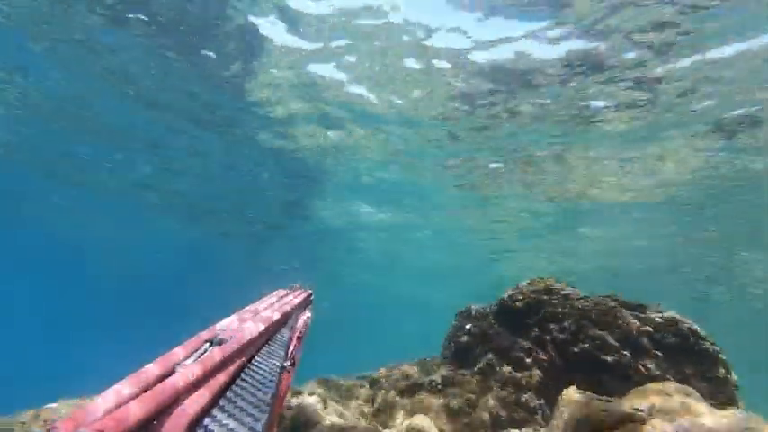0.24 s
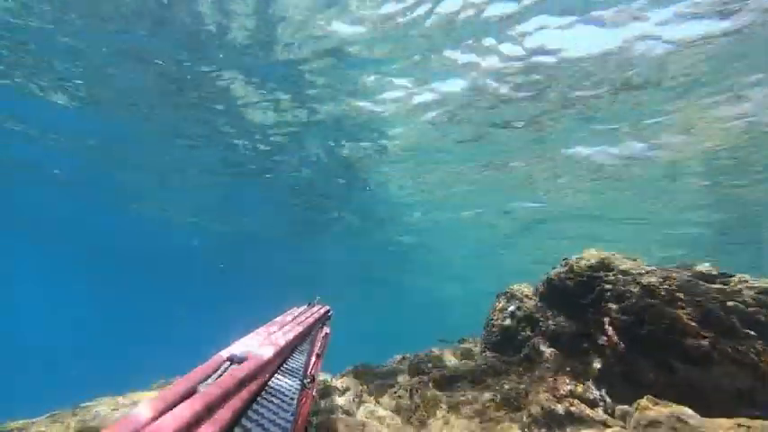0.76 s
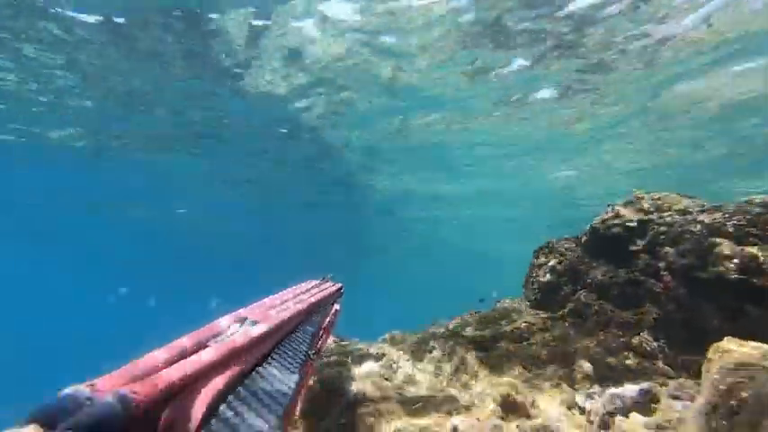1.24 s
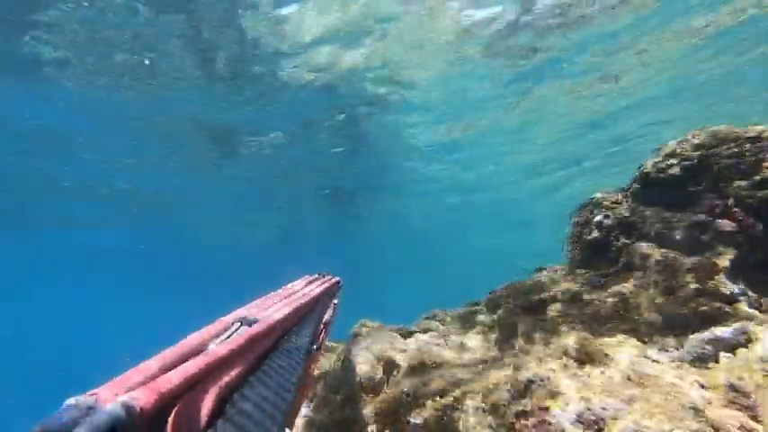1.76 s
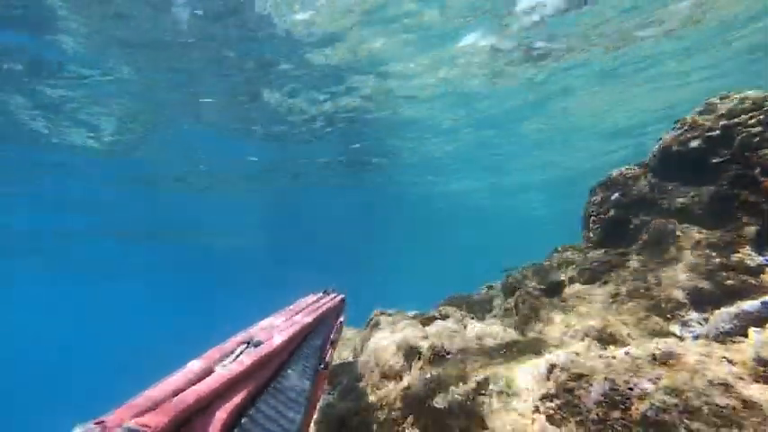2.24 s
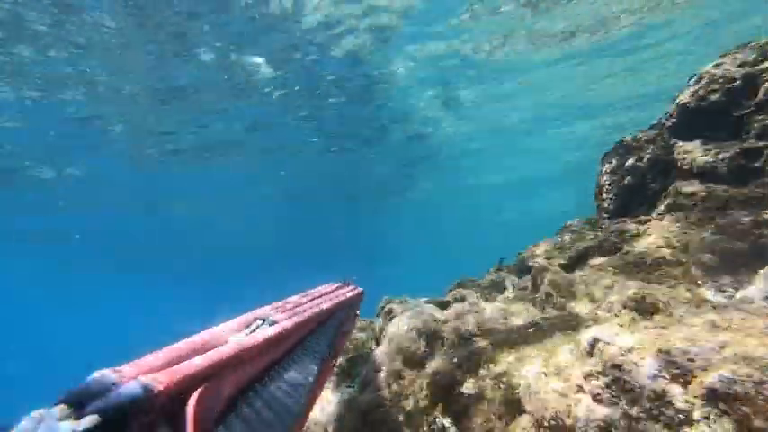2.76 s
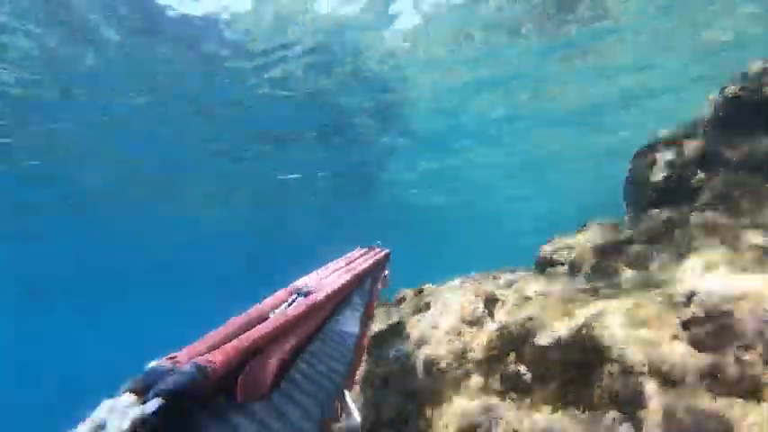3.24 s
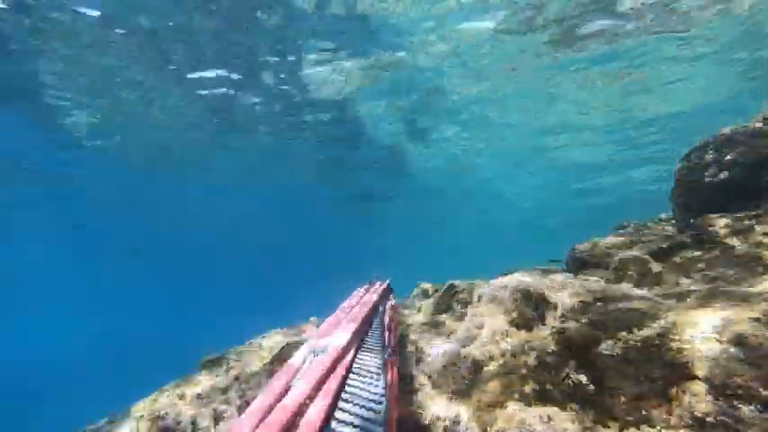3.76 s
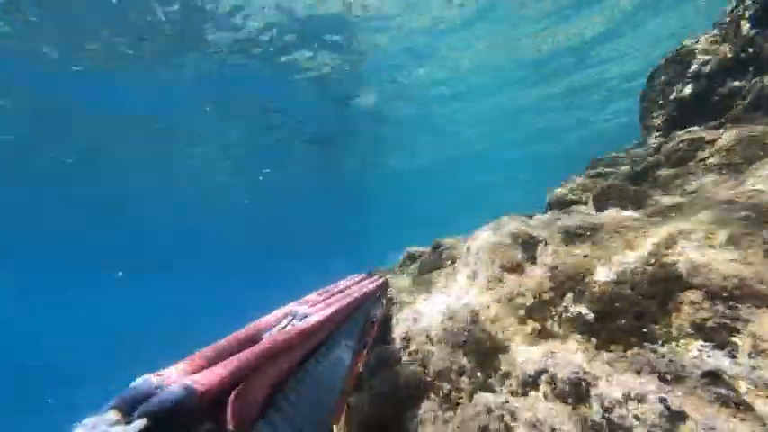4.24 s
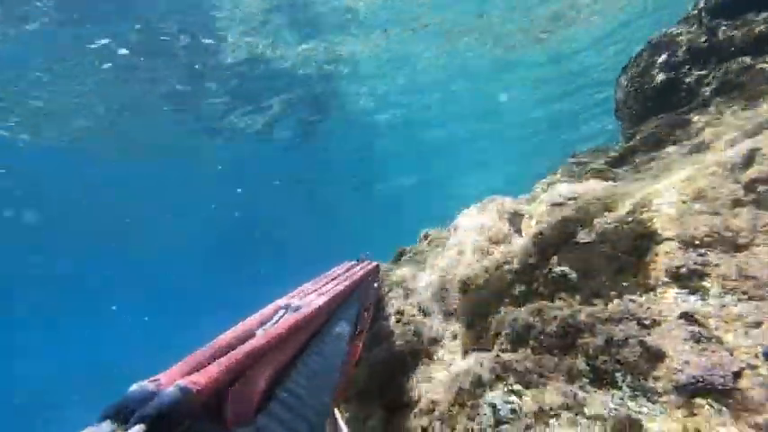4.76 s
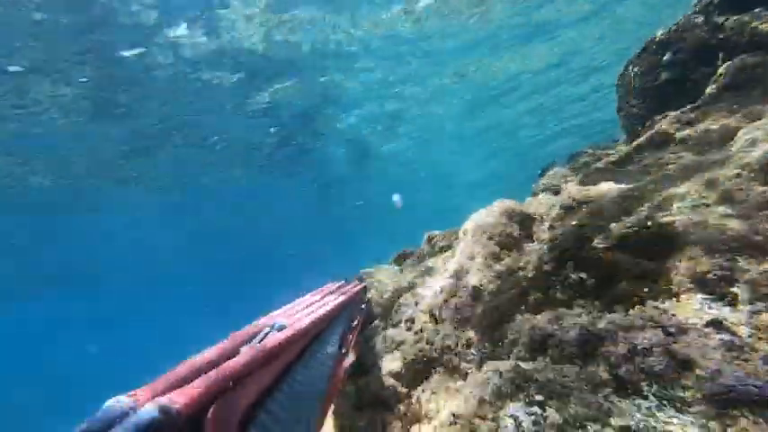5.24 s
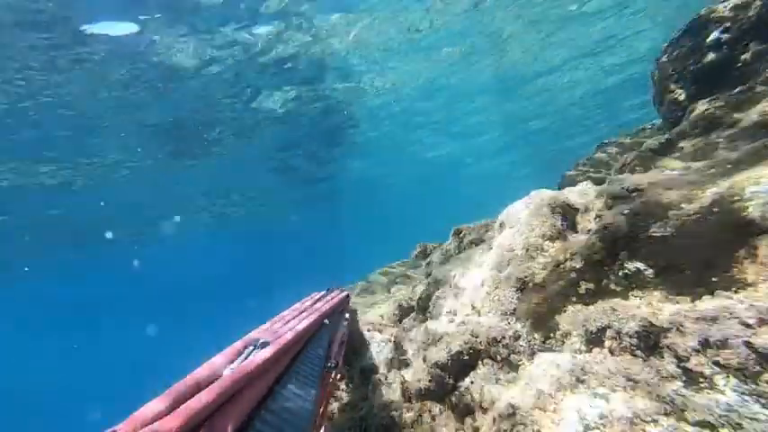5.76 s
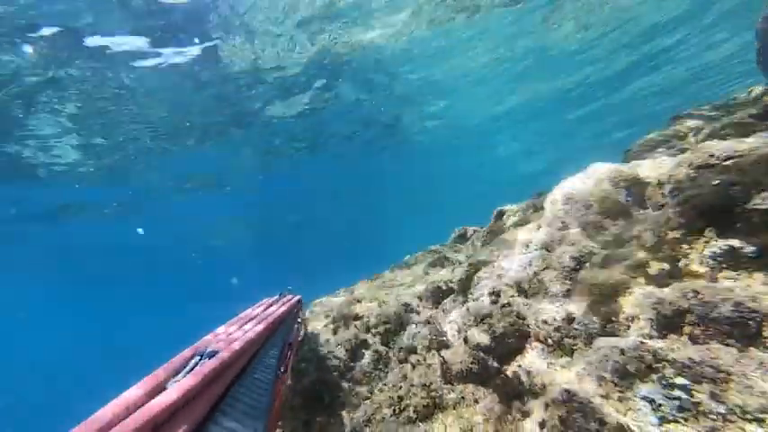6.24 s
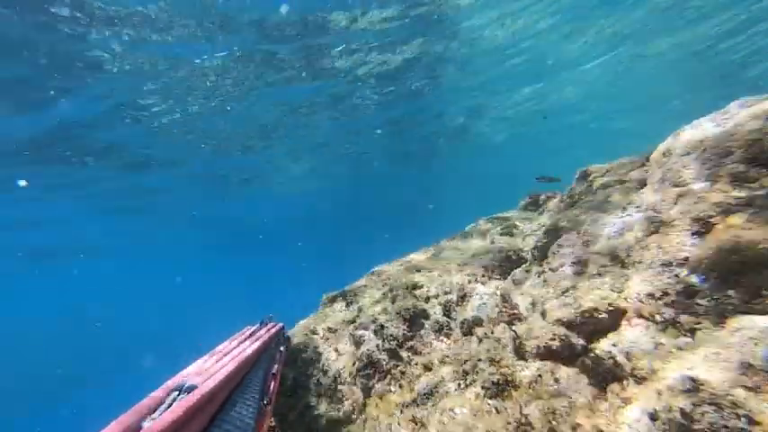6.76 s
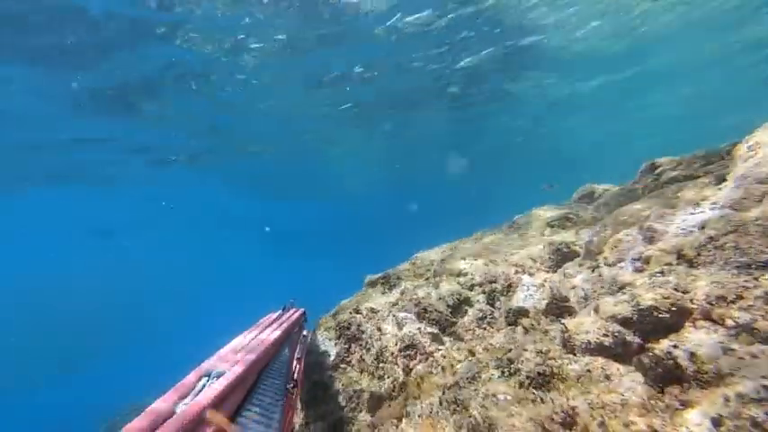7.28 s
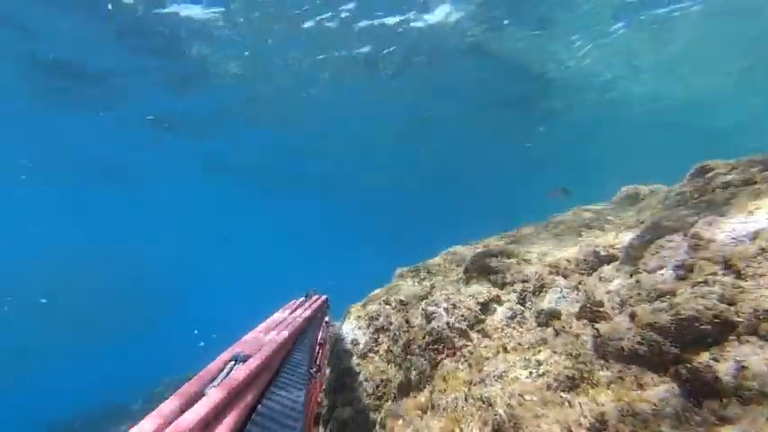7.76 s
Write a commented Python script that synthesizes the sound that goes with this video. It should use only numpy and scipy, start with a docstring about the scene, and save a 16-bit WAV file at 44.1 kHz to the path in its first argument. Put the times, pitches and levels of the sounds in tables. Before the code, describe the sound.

Underwater beside a shallow rocky reef, everything is heard very close through a camera's hard housing, in stereo with a boxy, muffled tone. From 0 to 3.2 seconds, gear rattles irregularly in dull, hard knocks, with chattering scrapes that turn brighter after 1.3 seconds and brief hollow ringing blips. Low pressure rumble drifts underneath. At 3.25 seconds a loud surge hits: rapid hollow knocks and clacks, a deep plop, gurgling and fizz. More bursts follow near 3.7, 4.4, 5.0 and 5.4 seconds, each quickly dying, with smaller knocks between. From about 5.9 to 6.8 seconds it is calmer, with faint swishing and a sharp snap at 6.5. Deeper churning and low plops return at 6.8 to 7.5 seconds, then fade towards 8 seconds. Distant snapping shrimp form a faint crackling wash throughout, with occasional single sharp snaps.

```python
"""A shallow rocky reef under water, heard through the housing of a diver's camera with two microphone ports.
First the gear rattles and scrapes: short noise hits and small slips ring the housing, with brief notes.
Then surges of water knock, plop, gurgle and fizz: swelling tones, rising bubble tones and coloured noise.
Snapping shrimp crackle throughout: a steady wash of far ones under single sharp snaps, a few of which,
around 6.95 s, are probably fizzing bubbles."""
import sys
import numpy as np
from scipy import signal
from scipy.fft import rfft, irfft, next_fast_len
from scipy.io import wavfile
from scipy.ndimage import uniform_filter1d

SR = 44100
rng = np.random.default_rng(int(sys.argv[2]) if len(sys.argv) > 2 else 0)


def dump_mix(stems):
    """Bounce the given channels to the path in sys.argv[1] as a 16-bit WAV at rate SR."""
    frames = np.atleast_2d(stems).T  # one column per channel
    limited = np.clip(frames, -1, 1)  # hard clip at full scale
    pcm = np.round(limited * 32767).astype(np.int16)
    wavfile.write(sys.argv[1], SR, pcm)


N = 353241  # length in samples, about 8 s

# All levels in the tables are relative: the functions raise or lower whole layers afterwards.

# Gear knocks. Each row: start in seconds, peak level in dB, treble against the body in dB.
RATTLES = [(0.052, -17.5, -34.5), (0.097, -19, -25.5), (0.125, -14, -23), (0.37, -14, -31),
           (0.482, -18.5, -49), (0.65, -21.5, -23), (0.745, -24, -39), (0.833, -15, -29.5),
           (0.907, -18, -52), (0.979, -20, -20), (1.275, -16, -21.5), (1.328, -22, -24.5),
           (1.349, -13, -27.5), (1.375, -23.5, -22), (1.417, -18, -35.5), (1.486, -22.5, -39),
           (1.547, -23.5, -34), (1.585, -12, -20), (1.738, -27, -26), (1.9751, -14.5, -32.5),
           (2.03, -28, -30.5), (2.399, -16.5, -25.5), (2.482, -18, -22), (2.603, -17.5, -24.5),
           (2.634, -20, -39.5), (2.713, -17.5, -27.5), (2.774, -19.5, -49.5), (2.923, -19.5, -29.5),
           (3.003, -22.5, -39.5), (3.066, -15, -29)]
# Sound colour of a knock, also of bright scraping. Each row: frequency in Hz, gain in dB.
RATTLE_COLOUR = [(120, -16), (310, -4), (400, -32.5), (510, -10.5), (650, 4), (900, 6), (1150, 1.5),
                 (1850, 0), (2300, -27.5), (2900, -15.5), (4000, -38.5), (4900, -42), (6000, -39.5),
                 (13000, -87)]


def rattles(level_db=5.5, mode_db=-6, usual_treble_db=-33, brightening=1.77, cloud_s=0.11, halving_db=8):
    """Hard knocks of the gear ring the housing; the brighter the knock, the shorter its reflections."""
    out = np.zeros((2, N))
    ring = housing_ring()
    for s, db, treble_db in RATTLES:
        extra_treble_db = treble_db - usual_treble_db
        # the reflections last half as long for every halving_db of extra treble, within limits
        t60 = cloud_s * 2 ** np.clip(-extra_treble_db / halving_db, -2, 1)
        blow = strike(t60, scatter=1.21, contact_s=0.0032)
        body = colour(blow, RATTLE_COLOUR, brightening * extra_treble_db)
        tone = signal.fftconvolve(blow, ring[None], axes=1)[:, :blow.shape[1]]
        knock = unit(body) + amp(mode_db) * unit(tone)
        add(out, s, peaked(knock, db + level_db))
    return out


# Notes of the housing when struck. Each row: pitch in Hz, level in dB, time to fall by 60 dB in seconds.
HOUSING_MODES = [(607, -2, .07), (885, 0, .055), (1455, -7, .04), (1790, -4, .035)]


def housing_ring():
    """The stiff housing answers a blow with several dying notes at once."""
    t = np.arange(SR // 8) / SR
    return sum(amp(db - 60 * t / t60) * np.sin(2 * np.pi * hz * t) for hz, db, t60 in HOUSING_MODES)


# Chattering rubs of the gear, which also stir the gurgle. Each row: start and end in seconds, level in dB.
RUBS = [(0.082, 0.138, -24.5), (0.195, 0.24, -35.5), (0.468, 0.535, -27.5), (0.565, 0.615, -26.5),
        (0.65, 0.7, -32), (0.71, 0.77, -32), (0.835, 0.872, -27.5), (0.896, 0.96, -30.5),
        (0.975, 1.055, -26.5), (1.11, 1.16, -43), (1.185, 1.2, -40), (1.225, 1.26, -35), (1.335, 1.4, -32),
        (1.417, 1.445, -27), (1.458, 1.52, -32.5), (1.6, 1.622, -30), (1.74, 1.763, -36), (1.96, 2.0, -38),
        (2.035, 2.065, -40.5), (2.125, 2.2, -39), (2.316, 2.38, -40.5), (2.38, 2.422, -31),
        (2.45, 2.48, -29), (2.48, 2.563, -21), (2.712, 2.745, -24.5), (2.755, 2.797, -35),
        (2.98, 3.035, -27.5), (3.065, 3.09, -34.5), (3.09, 3.23, -38)]
# The scraping grows brighter as the grip shifts. Each row: time in seconds, bright share from 0 to 1.
GRIP = [(0, 0.03), (.5, 0.02), (1.2, 0.02), (1.35, 0.73), (3.2, 0.93)]
# Sound colour of the dull scraping. Each row: frequency in Hz, gain in dB.
SCRAPE_COLOUR = [(200, -44), (310, 8), (390, -21.5), (600, 11.5), (770, -6.5), (900, 19.5), (1150, -39),
                 (1460, -22), (1900, -68), (2300, -20), (2900, -9), (4000, -53), (5000, -21), (13000, -123)]


def scrape(touch_db=-50, rub_db=1.0, ring_db=-1):
    """Quick small slips of the gear ring the housing: faint while it is held, loud in each rub."""
    slips = clicks(per_s=380, spread_db=2.0) + 0.09 * rng.standard_normal((2, N))
    # swapping the two channels makes the ring differ from the body of the sound
    ringing = signal.oaconvolve(slips[::-1], housing_ring()[None], axes=1)[:, :N]
    dull = unit(unit(colour(slips, SCRAPE_COLOUR)) + amp(ring_db) * unit(ringing))
    # the same slips, shifted by one second so that they do not coincide with the dull ones
    shifted = np.roll(slips, SR, axis=1)
    bright = unit(colour(shifted, RATTLE_COLOUR, treble_db=6.5, corner_hz=1100))
    share = np.clip(curve(GRIP), 0, 1)
    rubbing = steadied(np.sqrt(1 - share) * dull + np.sqrt(share) * bright, span_s=0.039)
    held = amp(touch_db) * during(GRIP)
    return rubbing * (held + amp(rub_db) * strokes(RUBS, attack_s=0.0028, release_s=0.001))


# Short ringing notes of the rubbing gear. Each row: start in seconds, pitch in Hz, peak level in dB.
BLIPS = [(0.093, 903, -17.5), (0.123, 880, -18), (0.585, 670, -22), (0.654, 615, -23.5),
         (0.679, 670, -28.5), (0.905, 931, -20), (0.98, 960, -18), (1.011, 690, -23), (1.336, 753, -29),
         (1.606, 1790, -23.5), (2.533, 887, -17), (2.631, 876, -16), (2.999, 766, -18.5)]


def blips(level_db=0, cycles=7.0):
    """Brief notes while the gear sticks and rubs: several near 890 Hz, a housing note, others elsewhere."""
    out = np.zeros((2, N))
    for s, hz, db in BLIPS:
        add(out, s, amp(db + level_db) * ping(hz, cycles, rise=0.0017))
    return out


# Knocks of water on the housing. Each row: start in seconds, then the levels in dB of the hollow note,
# the hard clack and the tick.
KNOCKS = [(3.2516, -6.5, -4.5, -17.5), (3.2605, -8.5, -8, -17.5), (3.2686, -4.5, -11.5, -20.5),
          (3.2788, -4, -24.5, -21.5), (3.3346, -7, -25, -24.5), (3.349, -13.5, -23, -34),
          (3.3579, -15.5, -22, -35), (3.643, -11.5, -9.5, -23.5), (3.6723, -7, -25, -26.5),
          (3.7275, -15, -18.5, -21), (3.734, -11, -18, -24.5), (3.7613, -8.5, -27.5, -25),
          (3.9061, -13.5, -15, -22), (4.0119, -22.5, -24, -31), (4.409, -10.5, -12.5, -17),
          (4.4182, -4, -14.5, -20.5), (4.4335, -8.5, -30, -23), (4.4533, -19, -17, -25),
          (4.4879, -7, -28, -28), (4.5423, -8, -28.5, -30), (4.705, -26, -27, -36),
          (4.7364, -21, -27, -29.5), (4.7683, -16.5, -34.5, -30.5), (4.7934, -11.5, -30, -28),
          (4.8831, -20, -20, -25.5), (5.0201, -6, -19, -21.5), (5.0845, -9.5, -25.5, -29.5),
          (5.1418, -14, -30.5, -33), (5.1655, -15.5, -28.5, -33), (5.2051, -10, -32.5, -35.5),
          (5.231, -15, -29.5, -36.5), (5.2764, -21.5, -40, -59), (5.4108, -22, -13.5, -24),
          (5.4312, -9.5, -26, -26.5), (5.4543, -9, -20.5, -23), (5.533, -7.5, -27.5, -28),
          (5.5531, -8.5, -21.5, -26.5), (5.5932, -11, -32, -32), (5.626, -15, -28, -39),
          (5.8089, -9.5, -32, -33), (6.0641, -19.5, -28.5, -37), (6.8367, -13, -32, -41),
          (6.8546, -8.5, -36.5, -39), (6.8643, -9, -21.5, -30.5), (6.9207, -17.5, -21.5, -27),
          (6.948, -12.5, -21.5, -29), (7.0647, -13, -18, -30), (7.38, -16, -18, -32.5),
          (7.5196, -19.5, -22, -30), (7.5643, -30, -22, -30.5), (7.6387, -24.5, -24, -29)]
# Sound colour of the tick. Each row: frequency in Hz, gain in dB.
TICK_COLOUR = [(500, -27), (2000, -16.5), (2400, -1), (2900, 1.5), (4600, -11.5), (7000, -23), (9500, -36),
               (13000, -54.5)]


def knocks(hollow_db=-1, clack_db=0, tick_db=0, clack_hz=1750, note_hz=870, octave_db=70, tail_db=-15):
    """Water slaps the housing: a hollow note with a sinking tail, a clack of the wall, and a tick."""
    out = np.zeros((2, N))
    for s, hollow, clack, tick in KNOCKS:
        knock = np.zeros((2, SR // 20))
        # soft slaps sound lower: one octave for every octave_db that the clack lies below the hollow note
        hz = note_hz * 2 ** (min(clack - hollow, 0) / octave_db)
        add(knock, 0, amp(hollow + hollow_db) * ping(hz, cycles=0.95))
        add(knock, 0, amp(hollow + tail_db) * ping(0.915 * hz, cycles=2.9, rise=-0.025))
        wall_hz = clack_hz * (1 + 0.095 * (rng.random() - .5))
        add(knock, 0.0003, amp(clack + clack_db) * ping(wall_hz, cycles=2.35))
        contact = strike(t60=0.026, scatter=0.18, contact_s=0.0021, onset_s=0.0018)
        add(knock, 0, peaked(colour(contact, TICK_COLOUR), tick + tick_db))
        add(out, s, scattered(knock, db=-10, t60=0.048))
    return out


# Plops of large air pockets. Each row: start in seconds, starting pitch in Hz, peak level in dB.
GLUGS = [(3.263, 240, -5), (3.734, 232, -11.5), (4.419, 207, -5), (5.023, 330, -8.5), (5.087, 288, -12.5),
         (5.477, 284, -11.5), (6.918, 207, -13), (7.107, 214, -16), (7.132, 186, -12), (7.403, 186, -16),
         (7.448, 171, -13.5)]


def glugs(level_db=-1):
    """Large air pockets are squeezed against the housing: each gives one short, low plop."""
    out = np.zeros((2, N))
    for s, hz, db in GLUGS:
        add(out, s, amp(db + level_db) * ping(hz, cycles=0.9, rise=0.0057))
    return out


# Surges of water against the housing. Each row: arrival, rise time and hold time in seconds,
# then the levels in dB of the deep push, the burbling air and the fizz.
SURGES = [(3.254, 0.013, 0.035, -8, -21, -24), (3.656, 0.019, 0.021, -7, -27, -28.5),
          (3.719, 0.0065, 0.012, -9, -29.5, -21), (4.42, 0.03, 0.018, -8, -19, -20),
          (4.754, 0.013, 0.022, -20.5, -32, -24), (5.013, 0.011, 0.056, -10, -27, -23),
          (5.176, 0.05, 0.26, -23, -35, -78), (5.413, 0.0093, 0.02, -7, -25, -17.5),
          (5.536, 0.015, 0.065, -27, -27, -30), (5.756, 0.016, 0.012, -12.5, -24, -33.5),
          (5.985, 0.21, 0.17, -44, -41, -39.5), (6.228, 0.03, 0.21, -64, -40, -39.5),
          (6.829, 0.0071, 0.012, -14.5, -27, -74), (6.905, 0.014, 0.044, -9, -30.5, -53),
          (7.097, 0.015, 0.07, -9.5, -30.5, -38), (7.327, 0.22, 0.13, -11.5, -24.5, -66),
          (7.842, 0.011, 0.045, -24, -34, -44)]
# how fast each part of a surge dies after its hold, in dB per second
PUSH_FALL, BURBLE_FALL, FIZZ_FALL = 68.7, 112, 94


def surging(part, fall_db_per_s):
    """Gain of one part of the surges (0 push, 1 burble, 2 fizz): each rises, holds and dies steadily."""
    t, power = np.arange(N) / SR, np.zeros(N)
    for s, rise_s, hold_s, *levels_db in SURGES:
        rise = np.clip((t - s) / rise_s + .5, 0, 1)
        fall_db = fall_db_per_s * np.maximum(t - s - hold_s, 0)
        power += (rise * amp(levels_db[part] - fall_db)) ** 2
    return np.sqrt(power)


# Sound colour of the first eddies. Each row: frequency in Hz, gain in dB.
GURGLE_COLOUR = [(40, -18), (65, 6), (100, 0.5), (143, 8.5), (178, -8), (210, -2), (250, -1.5), (290, 2),
                 (350, -11), (450, -11.5), (1000, -39), (3000, -77)]
# Sound colour of the later, deeper churn. Each row: frequency in Hz, gain in dB.
CHURN_COLOUR = [(40, -13.5), (65, -9), (100, -1.5), (140, 5.5), (200, -3), (250, -5.5), (300, -3),
                (360, -28), (450, -14), (1000, -30), (3000, -78)]
# The burbling sinks to the deeper churn. Each row: time in seconds, deep share from 0 to 1.
DEEPENING = [(6.2, 0.02), (6.8, 0.95)]


def gurgle(level_db=1.5, bubble_db=-1, held_db=-48, rub_db=-18, calm_db=-61):
    """Eddies, large air pockets and smaller ones burble, stirred by surges and by the moving gear."""
    flow = rng.standard_normal((2, N))
    deep = np.clip(curve(DEEPENING), 0, 1)
    first_eddies = unit(colour(flow, GURGLE_COLOUR))
    churn = unit(colour(flow[::-1], CHURN_COLOUR))  # the same flow with its channels swapped
    eddies = np.sqrt(1 - deep) * first_eddies + np.sqrt(deep) * churn
    large = bubbles(low_hz=109.8, high_hz=159.2, per_s=20, cycles=9.4, rise=0.0066, spread_db=1.5)
    small = bubbles(low_hz=192.0, high_hz=299.3, per_s=37, cycles=6.8, rise=0.0065, spread_db=9.0)
    burble = eddies + amp(bubble_db) * unit(large + 0.1 * (1 - 1.41 * deep) * small)
    rubbing = amp(rub_db) * strokes(RUBS, attack_s=.01, release_s=0.0067)
    stirring = amp(level_db) * surging(1, BURBLE_FALL) + amp(held_db) * during(GRIP) + rubbing
    return steadied(burble, span_s=0.086) * (stirring + amp(calm_db))


# Sheets of water along the housing. Each row: start and end in seconds, level in dB.
SWISHES = [(3.225, 3.28, -22.5), (3.43, 3.6, -34), (3.612, 3.66, -27), (3.888, 3.93, -27.5),
           (4.035, 4.09, -34.0), (4.355, 4.405, -33), (4.408, 4.46, -21.5), (4.74, 4.815, -29.5),
           (5.305, 5.38, -36), (5.38, 5.418, -20), (5.53, 5.57, -26.5), (5.68, 5.76, -29),
           (6.32, 6.435, -31.5), (6.925, 6.965, -25.5), (6.97, 7.04, -32.5), (7.048, 7.07, -32.5),
           (7.09, 7.15, -27.5), (7.305, 7.37, -31), (7.37, 7.49, -31), (7.52, 7.565, -31.5),
           (7.612, 7.63, -32.5), (7.66, 7.7, -43), (7.85, 7.91, -41.5)]
# Sound colour of fizzing water, here and in the slosh. Each row: frequency in Hz, gain in dB.
SWISH_COLOUR = [(150, -23), (450, -25), (750, -5.5), (1000, -14.5), (1250, -11.5), (1420, -27.5),
                (1650, -14.5), (1950, -22), (2400, -31.5), (2950, -25), (3700, -39.5), (7000, -52.5),
                (13000, -83.5)]


def swishes(level_db=-1, bubble_db=-7):
    """Sheets of fine fizz and tiny bubbles sweep along the housing."""
    grains = clicks(per_s=1800, spread_db=3.0)
    fizz = unit(colour(grains, SWISH_COLOUR, treble_db=1.5, corner_hz=2500))
    beads = unit(bubbles(low_hz=650, high_hz=2050, per_s=450, cycles=3, rise=.003, spread_db=2))
    sheet = steadied(fizz + amp(bubble_db) * beads, span_s=0.056)
    return sheet * amp(level_db) * strokes(SWISHES, attack_s=0.0028, release_s=0.0018)


def slosh(level_db=-5, bubble_db=-5, calm_db=-62, slap_s=0.0038):
    """Small soft slaps and short ringing bubbles in the water that each surge drives past."""
    bell = np.exp(-(np.arange(-SR // 100, SR // 100) / SR / (slap_s / 2)) ** 2)
    impulses = (clicks(per_s=300, spread_db=6.5) ** 2).mean(0)
    # each click becomes a smooth little swell in the loudness of the noise
    slapping = np.sqrt(abs(signal.oaconvolve(impulses, bell, "same")))
    noise = (unit(slapping) + 0.078) * rng.standard_normal((2, N))
    slaps = colour(noise, SWISH_COLOUR, treble_db=0.0, corner_hz=2500)
    pops = bubbles(low_hz=450, high_hz=1200, per_s=220, cycles=2.2, rise=.005, spread_db=3)
    fizz = steadied(unit(slaps) + amp(bubble_db) * unit(pops), span_s=0.083)
    return fizz * (amp(level_db) * surging(2, FIZZ_FALL) + amp(calm_db))


# Slow pressure drift. Each row: time in seconds, level in dB.
DRIFT = [(0, -29), (2.4, -25), (3.2, -30.5), (4.1, -48), (6.6, -35), (8, -33)]


def sway(level_db=-3.5):
    """Slow pressure drift, and the housing's deepest note swung by each surge."""
    drift = swing(hz=15.2, width_hz=13.5) * amp(curve(DRIFT))
    return drift + swing(hz=36.83, width_hz=14.0) * amp(level_db) * surging(0, PUSH_FALL)


def swing(hz, width_hz):
    """Turbulence, as noise, through one deep resonance at an even level, separate for each channel."""
    f = np.fft.rfftfreq(N, 1 / SR)
    response = 1 / (1 + 1j * (f ** 2 - hz ** 2) / (width_hz * f + 1e-9)) ** 2
    channels = []
    for _ in range(2):
        deep = irfft(rfft(rng.standard_normal(N)) * response, N)
        channels.append(steadied(deep[None], span_s=0.077))
    return np.concatenate(channels)


# Single sharp snaps: near shrimp, and around 6.95 s probably fizzing bubbles.
# Each row: start in seconds, peak level in dB, treble against the body in dB.
SNAPS = [(0.6306, -24, -17.5), (0.7368, -29.5, -5.5), (1.0927, -30.5, -25), (1.859, -35.5, -9),
         (2.223, -24.5, -25.5), (2.583, -34.5, -22), (2.968, -33, -23), (6.487, -32, -22),
         (6.515, -16.5, -45), (6.794, -40, -15), (6.938, -28, -21), (6.964, -35.5, -15.5),
         (7.9518, -37, -27.5)]
# Sound colour of a snap, near or far. Each row: frequency in Hz, gain in dB.
SNAP_COLOUR = [(300, -72), (1100, -29), (2400, -13), (3000, -7), (4100, -24), (5000, -10), (6200, -17.5),
               (10000, -20.5), (13000, -55.5)]


def sharp_snaps(level_db=3.0, usual_treble_db=-12, brightening=1.17):
    """Single snaps, mostly of near shrimp: a very short burst and a brief scatter off the rocks."""
    out = np.zeros((2, N))
    for s, db, treble_db in SNAPS:
        snap = strike(t60=0.058, scatter=1.0, contact_s=0.00027)
        extra_treble_db = brightening * (treble_db - usual_treble_db)
        add(out, s, peaked(colour(snap, SNAP_COLOUR, extra_treble_db, corner_hz=5400), db + level_db))
    return out


# Level of the background wash and crackle, which drops once the loud water begins.
# Each row: time in seconds, level in dB.
BACKGROUND_LEVEL = [(0, -62), (1.2, -55.5), (2.86, -65), (3.17, -58.5), (3.45, -67.5), (5.95, -76),
                    (6.65, -64), (7.78, -70)]
# Sound colour of the distant wash. Each row: frequency in Hz, gain in dB.
REEF_COLOUR = [(150, -37.5), (400, -19), (850, -12), (1150, -20.5), (1850, -26.5), (2350, -31.5),
               (2950, -27), (4200, -39), (5000, -34), (8000, -48), (10000, -46), (13000, -68)]


def reef(wash_db=12, crackle_db=3):
    """Countless far snaps merge into a wash of noise; nearer ones crackle above it."""
    wash = unit(colour(rng.standard_normal((2, N)), REEF_COLOUR))
    pops = clicks(per_s=90, spread_db=6)
    snaps = signal.oaconvolve(pops, strike(t60=0.13, scatter=1.0, contact_s=0.00081), axes=1)[:, :N]
    crackle = unit(colour(snaps, SNAP_COLOUR, treble_db=-14, corner_hz=5660))
    return (amp(wash_db) * wash + amp(crackle_db) * crackle) * amp(curve(BACKGROUND_LEVEL))


# Timing between the ports. Each row: frequency in Hz, phase in radians by which the left leads.
PORT_PHASE = [(0, 0), (420, 0), (600, -.7), (790, -3.4), (900, -4.1), (1300, -4.3), (1550, -5),
              (2000, -5.3), (2300, -8), (2950, -6.9), (3200, -5.3), (4300, -4.6), (5000, -8), (7000, -9.5),
              (8400, -6.3)]
# Balance between the ports. Each row: frequency in Hz, left level minus right level in dB.
PORT_BALANCE = [(240, -.4), (430, -4), (760, -7), (1140, -1), (1860, -4), (3000, 2), (4500, -1), (8000, -3)]
# How alike the ports sound. Each row: frequency in Hz, likeness from 0 to 1.
PORT_LIKENESS = [(300, .99), (500, .8), (900, .97), (1300, .75), (1800, .93), (3800, .8), (5500, .5),
                 (7800, .5), (8800, .9)]


def ports(x):
    """The housing carries the sound to its two ports with different delay and strength."""
    size = next_fast_len(N + SR // 10)
    hz = np.fft.rfftfreq(size, 1 / SR)
    shared, own = rfft(x, size)
    likeness = np.clip(read(PORT_LIKENESS, hz), 0, 1)
    lean = amp(read(PORT_BALANCE, hz) / 2)
    # the right port hears the shared sound; the left mixes it with sound of its own
    left = likeness * shared + np.sqrt(1 - likeness ** 2) * own
    left = left * np.exp(1j * read(PORT_PHASE, hz))
    return irfft(np.array([left * lean, shared / lean]), size)[:, :N]


def strike(t60, scatter, contact_s=0.006, onset_s=0.00049):
    """A short contact with a slightly soft onset, followed by a dying cloud of reflections."""
    t = np.arange(SR // 5) / SR
    contact, cloud = rng.standard_normal((2, 2, len(t)))
    onset = 1 - np.exp(-(t / onset_s) ** 2)
    hit = unit(contact * onset * np.exp(-t / contact_s))
    return hit + scatter * unit(cloud * onset * amp(-60 * t / max(t60, .004)))


def ping(hz, cycles, rise=0):
    """A tone that swells and dies, with peak about 1; a quarter turn apart in the two channels."""
    age = np.arange(int(7 * cycles / hz * SR)) * hz / (cycles * SR)
    start, side = rng.random(2)
    quarter = np.array([[np.sign(side - .5) / 4], [0]])  # either channel may lead
    turns = cycles * age * (1 + rise * age) + start + quarter
    return np.sin(2 * np.pi * turns) * (age * np.exp(1 - age)) ** 2


def bubbles(low_hz, high_hz, per_s, cycles, rise, spread_db, count=24):
    """Bubbles of many sizes, each a dying tone that rises a little."""
    out = np.zeros((2, N))
    for hz in np.geomspace(low_hz, high_hz, count):
        age = np.arange(int(5 * cycles / hz * SR)) * hz / (cycles * SR)
        tone = np.sin(2 * np.pi * cycles * age * (1 + rise * age)) * np.exp(-age)
        draws = rng.random((200, 4))
        for when, size, left, right in draws[:int(per_s * N / SR / count)]:
            gain = amp(-spread_db * np.log(0.018 + size))  # mostly faint, a few strong
            add(out, when * N / SR, np.outer([left - .5, right - .5], tone) * gain)
    return out


def clicks(per_s, spread_db):
    """Random clicks, mostly small and a few large, of different strength in each channel."""
    size = amp(spread_db * np.minimum(rng.exponential(1, N), 4))
    return size * (rng.random(N) < per_s / SR) * rng.standard_normal((2, N))


def scattered(x, db, t60):
    """Adds a faint cloud of reflections from the rocks and the surface."""
    t = np.arange(SR // 5) / SR
    onset = np.clip(t / .004 - .5, 0, 1)
    cloud = rng.standard_normal((2, len(t))) * onset * amp(-60 * t / t60)
    cloud *= amp(db) / np.linalg.norm(cloud, axis=1, keepdims=True)
    cloud[:, 0] = 1  # the direct sound
    return signal.fftconvolve(x, cloud, axes=1)


def dappled(x, depth_db, size, span=3):
    """Shifting paths through bubbly water lift and sink small patches of the spectrum."""
    z = signal.stft(x, nperseg=size, noverlap=size * 3 // 4)[2]
    field = rng.standard_normal(z.shape[1:])
    for _ in range(2):
        field = uniform_filter1d(uniform_filter1d(field, size=2, axis=0), size=span, axis=1)
    patches = amp(depth_db * np.clip(unit(field), -2, 2))
    out = signal.istft(z * patches, nperseg=size, noverlap=size * 3 // 4)[1][:, :N]
    return unit(out) * x.std()  # keeps the overall level


def strokes(rows, attack_s, release_s):
    """Gain from rows of start, end and level: each stroke sets in, holds and dies, the longer the softer."""
    t, power = np.arange(N) / SR, np.zeros(N)
    for start, end, db in rows:
        length = end - start
        attack = np.clip((t - start) / (attack_s + length / 2) + .5, 0, 1)
        release = np.exp(-np.clip((t - end) / (release_s + length / 10), 0, 20))
        power += (amp(db) * attack * release) ** 2
    return np.sqrt(power)


def steadied(x, span_s):
    """Evens out level drift slower than span_s, leaving the grain."""
    power = uniform_filter1d((x ** 2).mean(0), size=int(span_s * SR) + 1)
    return x / np.sqrt(abs(power) + .03 * power.mean())


def colour(x, points, treble_db=0, corner_hz=3000):
    """Filters with the given spectrum and a treble shelf, without sounding ahead of the input."""
    size = 4096
    hz = abs(np.fft.fftfreq(size, 1 / SR))
    shelf = hz ** 4 / (hz ** 4 + corner_hz ** 4)
    log_gain = np.log(amp(read(points, hz) + treble_db * shelf))
    # minimum phase: the filter answers as early as its spectrum allows
    taps = np.fft.ifft(np.exp(np.conj(signal.hilbert(log_gain)))).real
    return signal.oaconvolve(x, taps[None, :size // 2], axes=1)[:, :x.shape[1]]


def amp(db):
    """Decibels to gain."""
    return 10 ** (np.asarray(db) / 20)


def unit(x):
    """Scales to an average (rms) level of 1."""
    return x / np.sqrt(np.mean(x ** 2) + 1e-20)


def peaked(x, db):
    """Scales each channel of a hit to the given peak level."""
    return amp(db) * x / abs(x).max(1, keepdims=True)


def read(points, hz):
    """Reads a frequency table on a log-frequency axis."""
    f, value = np.transpose(points)
    return np.interp(np.log(hz + 1), np.log(f + 1), value)


def curve(rows):
    """Reads a time table at every sample."""
    return np.interp(np.arange(N) / SR, *np.transpose(rows))


def during(rows):
    """One while a time table lasts, fading to zero outside."""
    t = np.arange(N) / SR
    inside = 1. * ((t >= rows[0][0]) & (t <= rows[-1][0]))
    return uniform_filter1d(inside, size=1500)


def add(mix, s, sound):
    """Adds a two-channel sound to the mix, in place, at time s in seconds."""
    part = mix[:, max(round(s * SR), 0):][:, :sound.shape[1]]
    part += sound[:, :part.shape[1]]


def scene():
    """Gear, water and reef, heard through the housing."""
    hits = dappled(rattles() + sharp_snaps(), depth_db=2.5, size=384)
    rubbing = dappled(scrape(), depth_db=2.5, size=768)
    wash = dappled(slosh() + swishes(), depth_db=3, size=512)
    bed = dappled(reef(), depth_db=2.5, size=512)
    water = knocks() + glugs() + wash + gurgle() + sway()
    return ports(hits + rubbing + blips() + water + bed)


EDGE_HZ = 13500  # upper band limit of the recorder


def record(dry):
    """The loudest peaks are rounded off; then the recorder's band limit."""
    rounded = dry / (1 + (dry / .93) ** 8) ** (1 / 8)
    band = signal.firwin(511, EDGE_HZ, window=("kaiser", 9), fs=SR)
    return signal.oaconvolve(rounded, band[None], "same", axes=1)


dry = scene()
out = record(dry)
dump_mix(out)
```